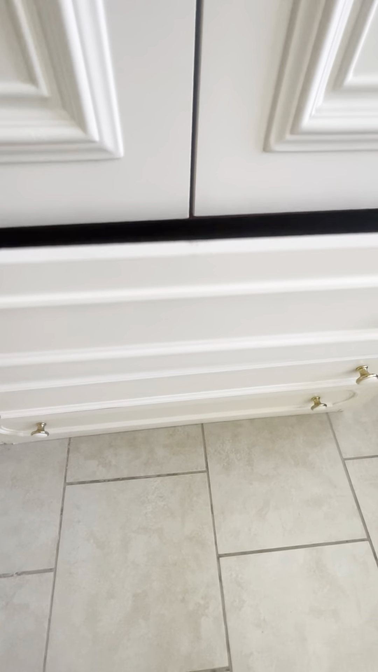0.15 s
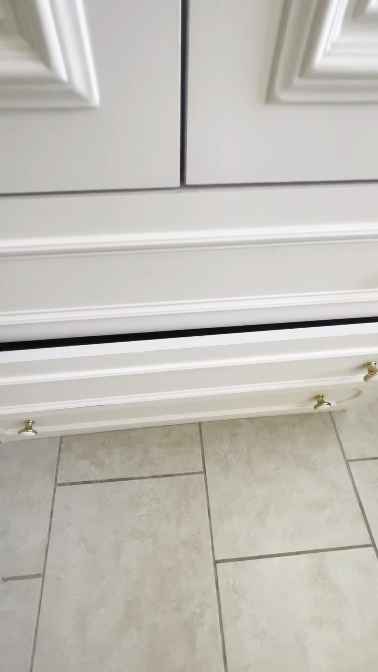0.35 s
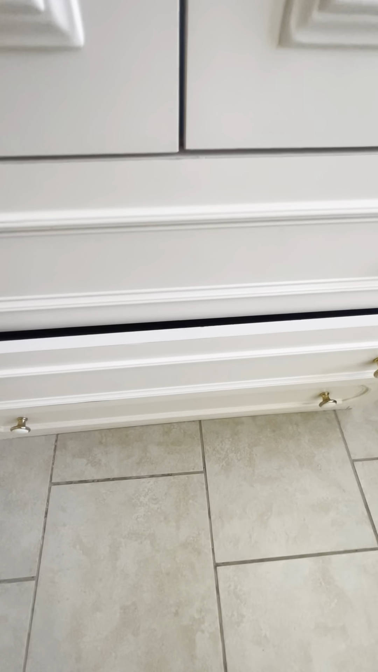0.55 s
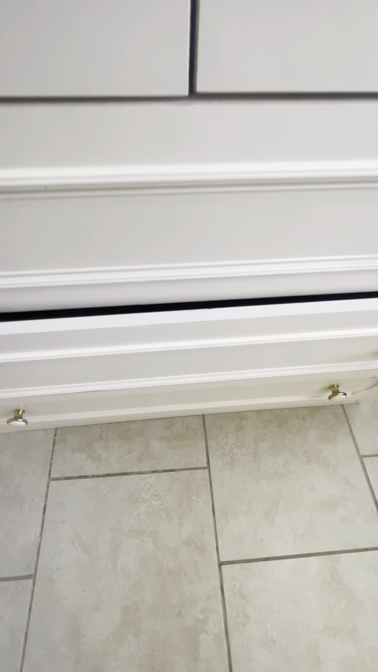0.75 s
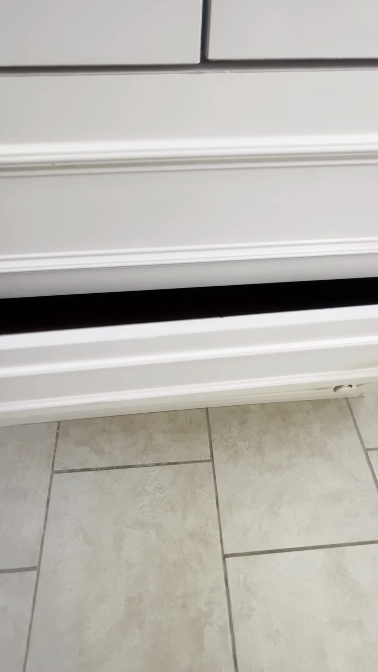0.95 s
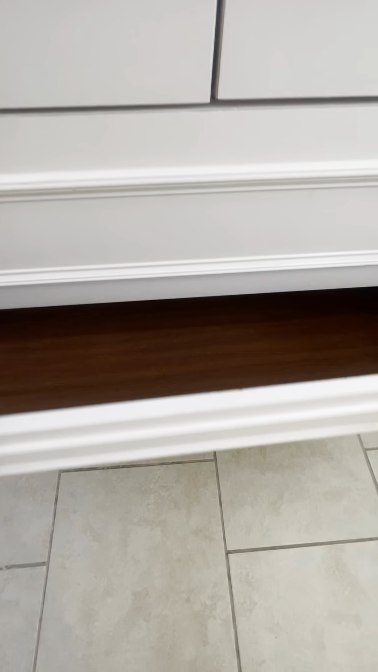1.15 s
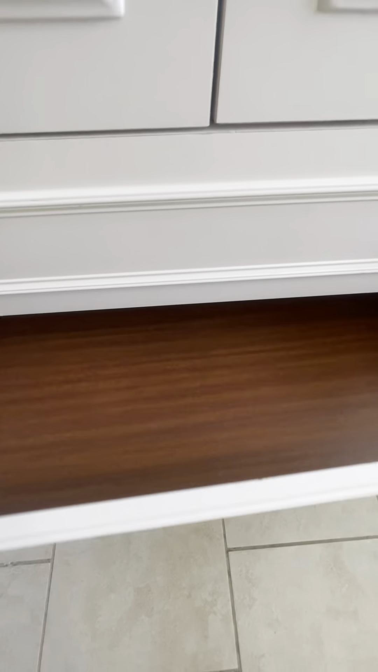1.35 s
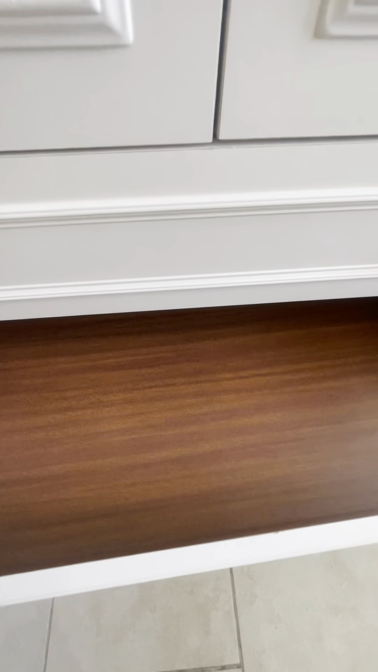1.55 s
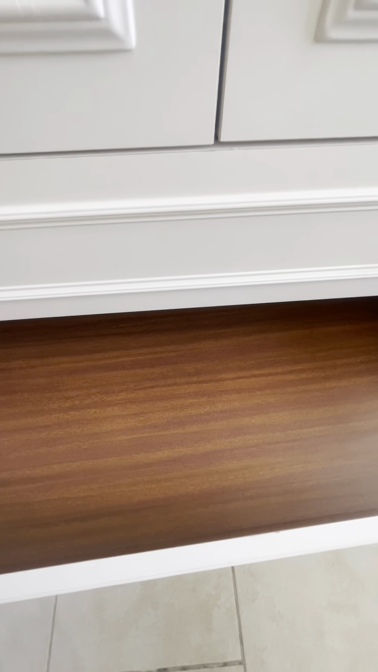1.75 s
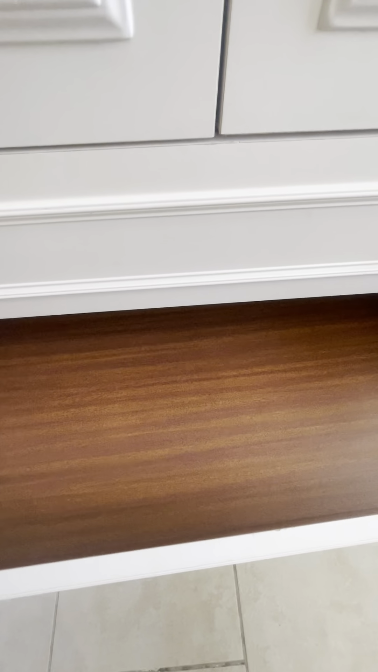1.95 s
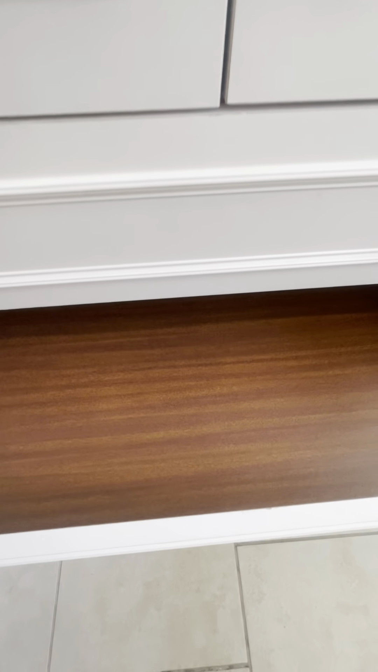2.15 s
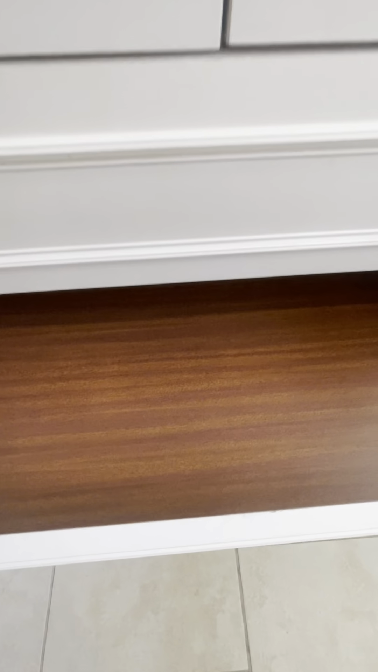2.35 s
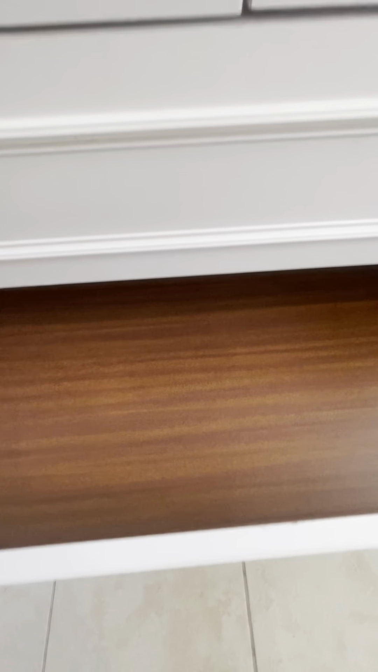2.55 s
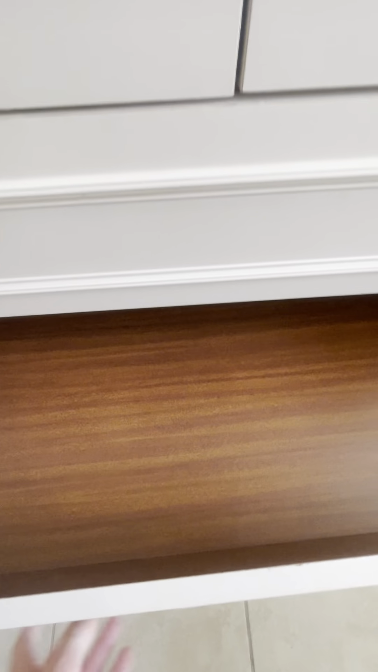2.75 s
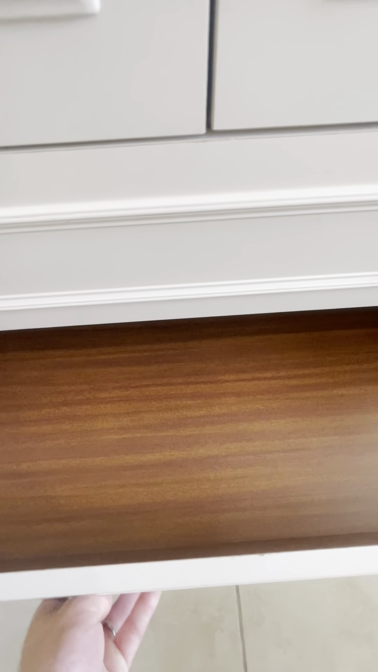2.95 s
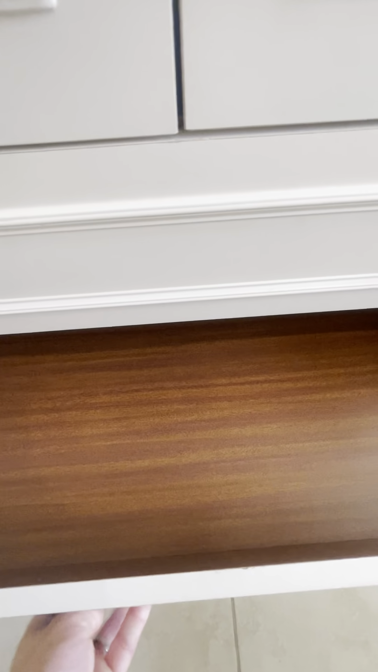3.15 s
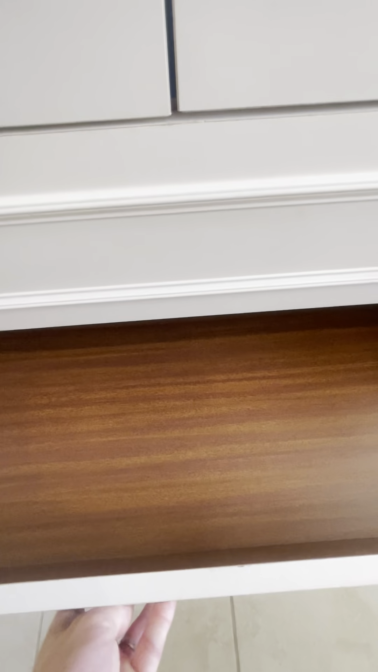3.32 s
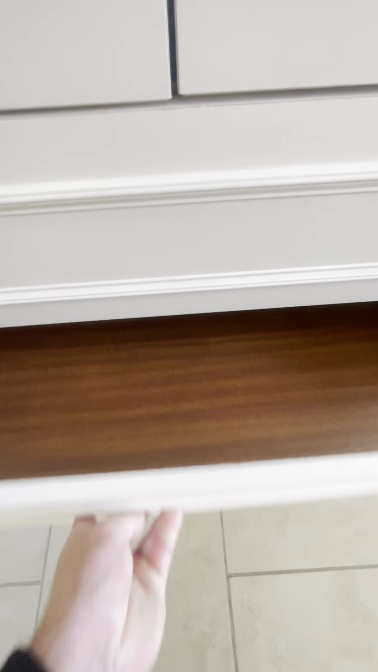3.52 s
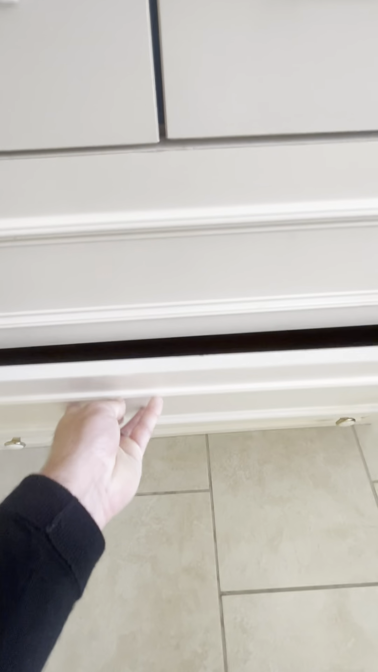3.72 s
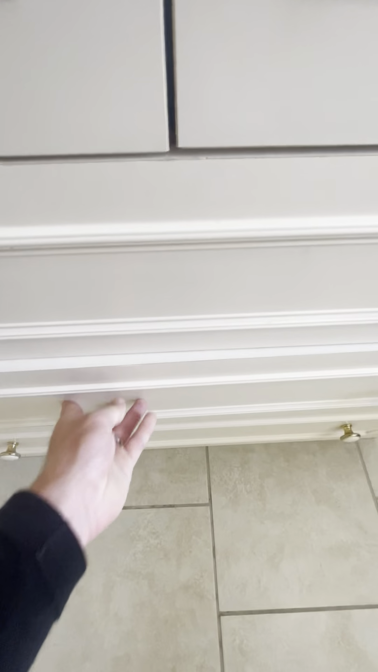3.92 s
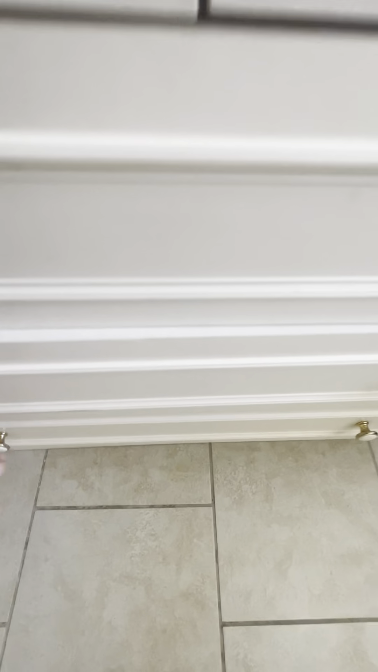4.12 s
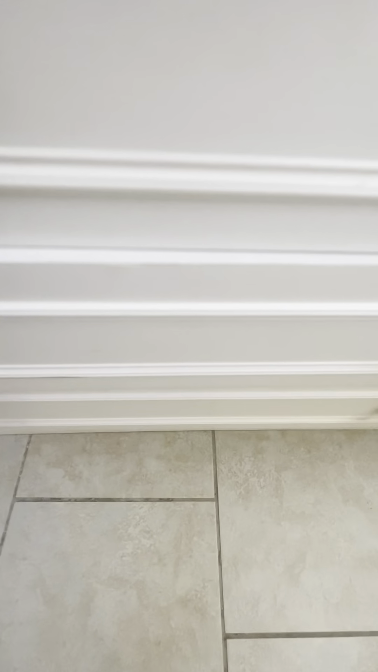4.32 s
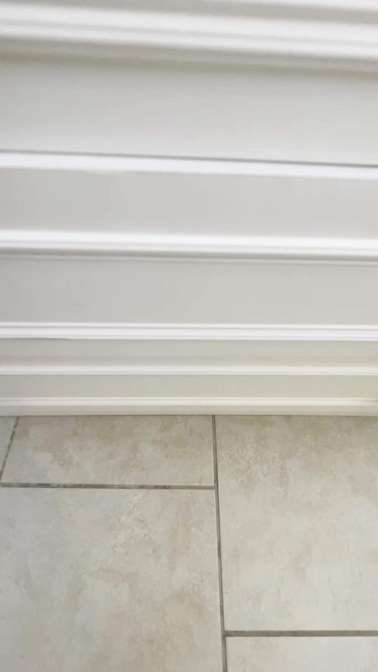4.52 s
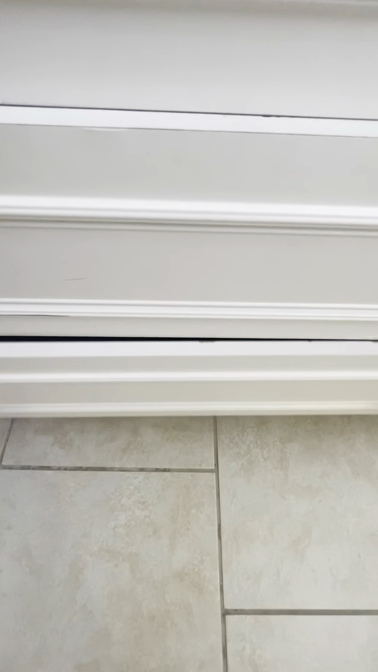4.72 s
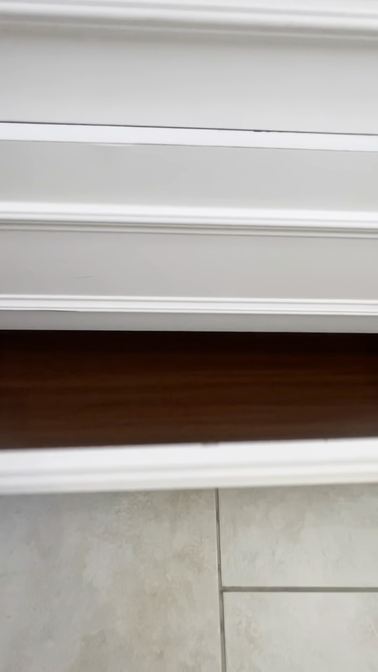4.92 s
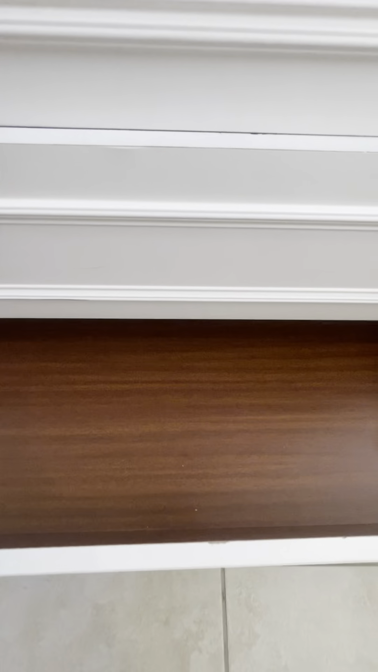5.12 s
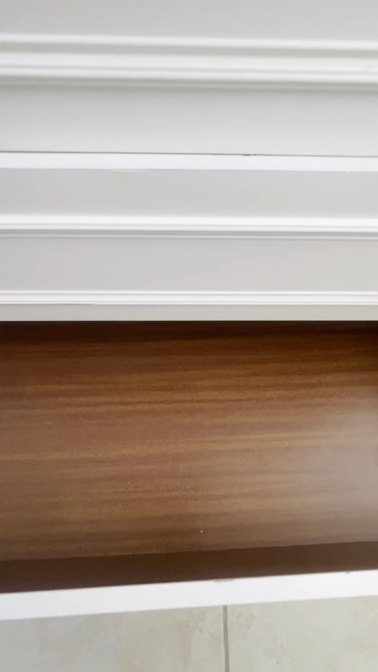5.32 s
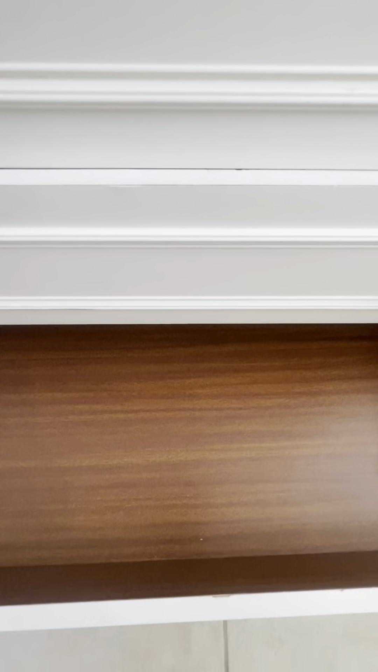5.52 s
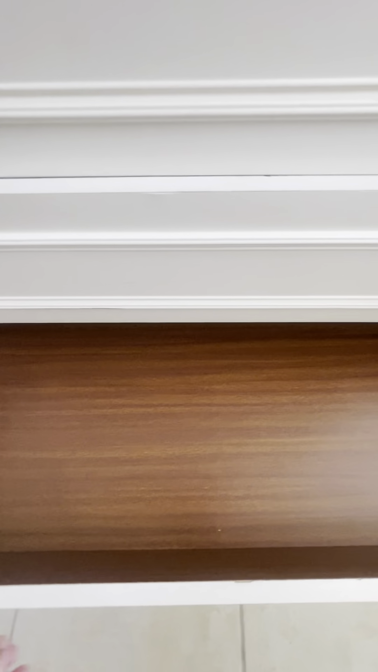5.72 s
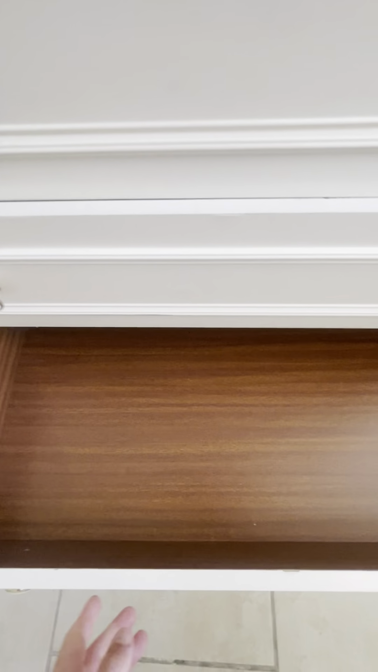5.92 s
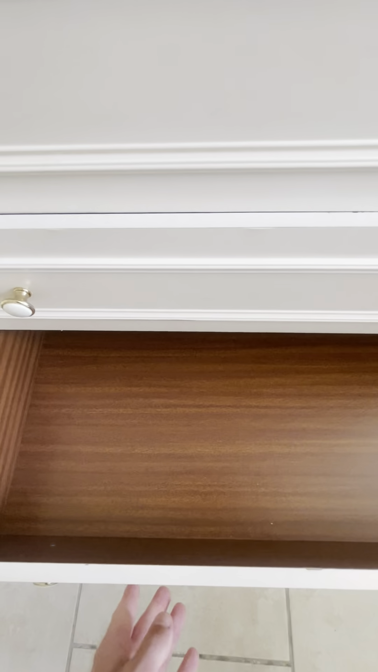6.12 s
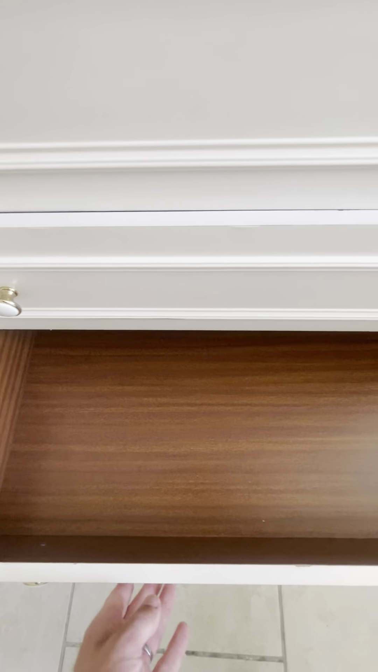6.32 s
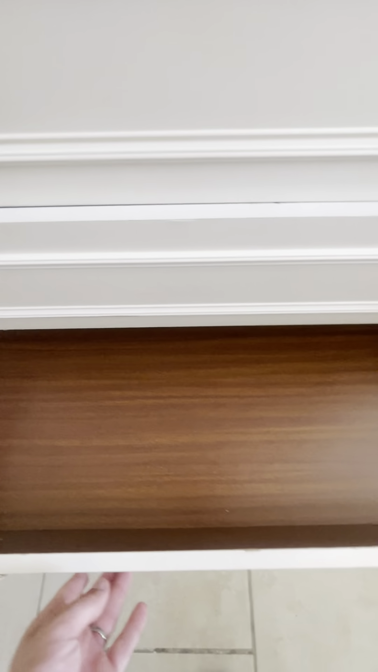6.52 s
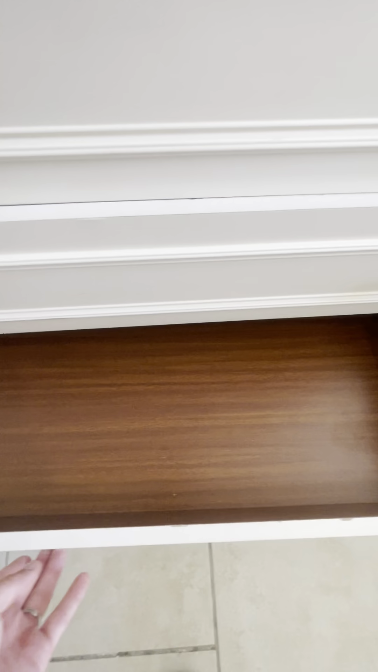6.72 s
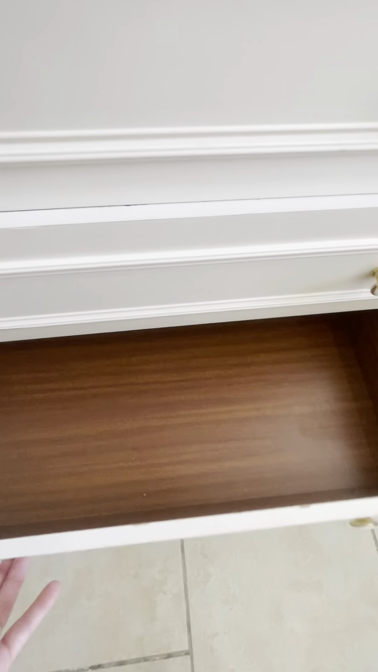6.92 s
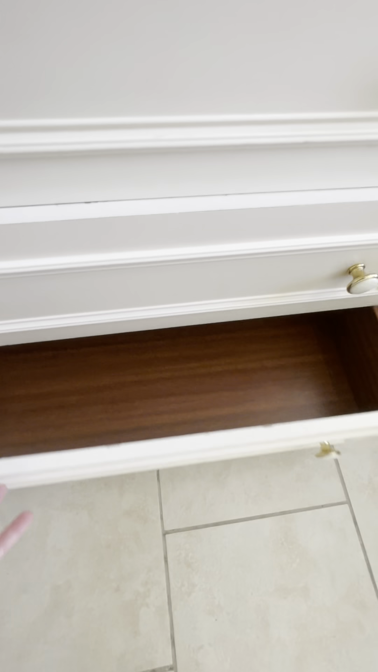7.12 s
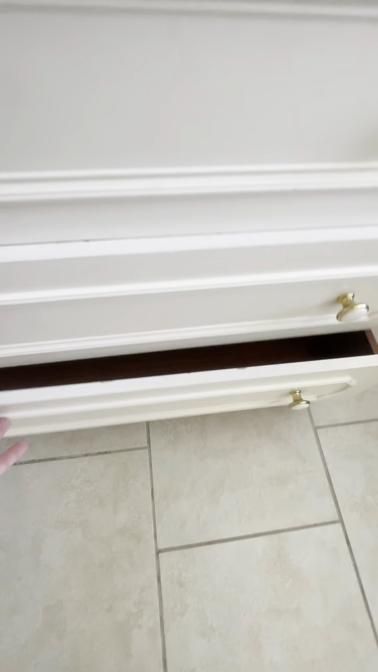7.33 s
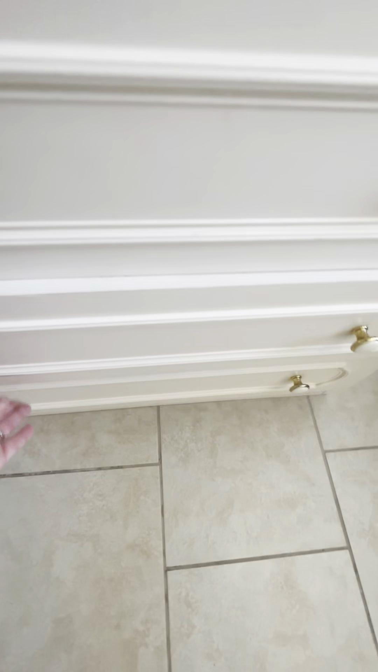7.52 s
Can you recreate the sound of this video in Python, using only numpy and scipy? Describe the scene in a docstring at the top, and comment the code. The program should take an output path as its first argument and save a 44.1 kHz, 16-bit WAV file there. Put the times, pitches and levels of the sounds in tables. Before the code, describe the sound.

Close to the microphone, a wooden drawer finishes sliding shut with a boomy thud, then is drawn open with a low humming rumble. After soft handling it is shoved back with jolts and a heavy double knock. A second drawer scrapes open to a bump, rests, then rasps and clacks shut. Quiet tiled room, short reflections, stereo leaning slightly left.

```python
"""Wooden drawers in a tiled bedroom

Two wardrobe drawers are pushed shut, pulled open and shut again, close to a two-port microphone.
Stick-slip friction on the runners excites the modes of the carcass, the thin bottom, the sides and the surface.
Jolts and knocks against the stops thump and clack the same parts; dry runners rasp, brass knobs ring faintly,
a sleeve rustles, and diffuse reflections ring for about half a second above faint room noise."""
import sys
import numpy as np
from scipy import signal
from scipy.fft import rfft, irfft, next_fast_len
from scipy.io import wavfile
from scipy.ndimage import uniform_filter1d

SR = 44100
rng = np.random.default_rng(int(sys.argv[2]) if len(sys.argv) > 2 else 0)


def store_wav(level_fs):
    """Save 16-bit WAV to argv[1]."""
    pcm = np.round(np.clip(np.atleast_2d(level_fs), -1, 1) * 32767)
    wavfile.write(sys.argv[1], SR, pcm.T.astype(np.int16))


N = 338186
TIME = np.arange(N) / SR  # s
RING = TIME[:int(0.5 * SR)]  # time axis of one impulse response, s


def undb(db):
    """Level to amplitude: 20 dB is a factor of ten."""
    return 10 ** (np.asarray(db) / 20)


def unit(x):
    """Energy normalisation: the squares sum to one."""
    return x / np.sqrt(np.sum(x ** 2))


def fade(t60):
    """Exponential damping: the amplitude falls by 60 dB in t60 seconds."""
    return np.exp(-np.log(1000) * RING / t60)


def colour(x, points):
    """Minimum-phase filtering: the cepstrum of a gain curve through (f/Hz, level/dB) is folded to be causal."""
    hz, db = np.transpose(points)
    size = 2 * next_fast_len(len(x))
    axis_hz = np.arange(size // 2 + 1) * SR / size
    curve_db = np.interp(np.log(axis_hz + 1), np.log(hz), db)
    cepstrum = irfft(np.log(undb(curve_db)))
    cepstrum[1:size // 2] *= 2
    cepstrum[size // 2 + 1:] = 0
    response = np.exp(rfft(cepstrum))
    return irfft(rfft(x, size) * response)[:len(x)]


def add(track, s, sound):
    """Linear superposition: mix a sound in from time s."""
    start = max(int(s * SR), 0)
    track[start:start + len(sound)] += sound[:N - start]


def speed(t, start, rise, hold, fall):
    """Trapezoidal kinematics: a move of the hand speeds up, runs steadily and slows to rest, 0 to 1."""
    speeding_up = (t - start) / rise
    slowing_down = 1 + (start + rise + hold - t) / fall
    return np.clip(np.minimum(speeding_up, slowing_down), 0, 1)


SLIDE_LAW = 1.055  # friction noise amplitude grows as speed to this power


def wander(rate):
    """Slow random modulation: Gaussian values held for 1 / rate s, then smoothed."""
    hold = int(SR / rate)
    steps = np.repeat(rng.standard_normal(N // hold + 1), hold)
    return uniform_filter1d(steps, hold)[:N]


def burst(t60):
    """Multipath scattering: one contact, spread over many paths in the wood, is a dying even-spectrum crackle."""
    spectrum = rfft(rng.standard_normal(len(RING)) * fade(t60))
    return irfft(spectrum / np.abs(spectrum), len(RING)) * fade(2 * t60)


# separate modes of each wooden part, before random scatter: f/Hz, level/dB, t60/s
CARCASS_MODES = [(44, -31, .25), (72.7, -1, 0.71), (95, 5.5, 0.25), (126.1, -7.5, 0.17), (147, -5.5, 0.16)]
BOTTOM_MODES = [(170, -18.5, 0.13), (202, -9, 0.46), (227.9, 5.5, 0.11), (262.6, -3.5, 0.27),
                (291.8, -4.5, 0.14), (335, -26.5, 0.12), (430, -30, 0.019)]
SIDE_MODES = [(470, 0, 0.048), (529, 7.5, 0.052), (683, -3.5, 0.15), (790, -1.5, 0.046), (913, -1, 0.033),
              (1102, -1.5, 0.078), (1192, -2.5, 0.085), (1419, -9.5, 0.02), (1700, -4, 0.029),
              (1900, -1.5, 0.08), (2138, -2.5, 0.088), (2520, -9, 0.04)]
SURFACE_MODES = [(3150, -3.5, 0.09), (4440, -17.5, 0.023), (5100, 5, 0.019), (6200, -7, 0.016),
                 (8630, -3.5, 0.045)]
# spectra of the crowded short modes of each part: f/Hz, level/dB
CARCASS_BLUR = [(15, -56), (33, -32.5), (45, 0.5), (65, 4), (95, 7), (150, -3.5), (210, -27.5), (400, -61)]
BOTTOM_BLUR = [(80, -58), (170, 0), (260, -5.5), (340, -1.5), (430, -20), (600, -41), (1200, -80)]
SIDE_BLUR = [(200, -41), (420, 4.5), (750, -3), (1250, -5), (1700, -5.5), (2100, -5.5), (2800, -8.5),
             (4200, -19), (9000, -69.5)]
SURFACE_BLUR = [(1200, -43), (2800, 6.5), (4000, 3.5), (6300, 0), (9000, -0.5), (11500, -4), (13000, -23),
                (16000, -23)]
# a part's number is its row here and in VOICING: 0 carcass, 1 bottom, 2 sides, 3 surface
PARTS = [(CARCASS_MODES, CARCASS_BLUR), (BOTTOM_MODES, BOTTOM_BLUR),
         (SIDE_MODES, SIDE_BLUR), (SURFACE_MODES, SURFACE_BLUR)]
# balance of each part: crowded modes level/dB, their nominal t60/s, sliding level/dB, blows level/dB,
# slip rate/(1/s), slip size spread/dB, room level/dB, left minus right level/dB
VOICING = [(-4.5, 0.11, 5.5, 0.5, 360, 3, -2.5, 3.5), (-6.5, 0.24, 0, -3, 260, 5, -8.5, 4.5),
           (5.5, 0.046, -1.5, 0.5, 520, 5, -3.5, 6), (14, 0.075, -13.5, 5.5, 2400, 7, -3.5, 4)]


def wood(part, near_hz=None, scatter_db=4.5, detune=0.012, focus_db=5):
    """Modal superposition: contact favours the modes near one pitch, falling focus_db an octave either way."""
    modes, blur = PARTS[part]
    blur_db, blur_t60 = VOICING[part][:2]
    ring = 0
    for (hz, db, t60), (a, b) in zip(modes, rng.standard_normal((len(modes), 2))):
        sign = np.sign(a) if part >= 2 else 1  # high modes change sign from place to place
        tone = np.sin(2 * np.pi * hz * (1 + detune * b) * RING)
        ring = ring + sign * undb(db + scatter_db * a) * fade(t60) * tone
    crowd = colour(burst(blur_t60), blur)
    ring = unit(ring) + undb(blur_db) * unit(crowd)
    if near_hz:
        focus = [(near_hz * 2. ** octave, -focus_db * abs(octave)) for octave in range(-2, 3)]
        ring = colour(ring, focus)
    return unit(ring)


def diffuse(left, right, alike_hz=330):
    """Diffuse-field coherence: both ports share the bass, while their treble is unrelated."""
    low = signal.butter(2, alike_hz, fs=SR, output="sos")
    high = signal.butter(2, alike_hz, "high", fs=SR, output="sos")
    side = signal.sosfilt(high, right) / np.sqrt(2)
    mid = signal.sosfilt(low, left) - signal.sosfilt(high, left) / np.sqrt(2)
    return np.array([mid + side, mid - side])


ROOM_T60_S = 0.47


def reflections(x, build_s=0.0011):
    """Reverberation by convolution: drawer and microphone move, so each quarter second has a new fine pattern."""
    hop = SR // 4
    padded = np.pad(x, (hop, 2 * hop))
    window = np.sin(np.pi * np.arange(2 * hop) / (2 * hop))
    decay = fade(ROOM_T60_S) * (1 - np.exp(-(RING / build_s) ** 2))
    out = np.zeros((2, len(padded) + len(RING)))
    for start in range(0, N + hop, hop):
        noise = diffuse(*rng.standard_normal((2, len(RING))))
        tail = unit(noise * decay) * np.sqrt(2)
        echo = signal.fftconvolve(tail, [padded[start:start + 2 * hop] * window], axes=1)
        out[:, start:start + echo.shape[1]] += echo
    return out[:, hop:hop + N]


# lead of the left port for the left and the right runner: t/s
RUNNER_LAGS_S = [0.000476, 0.00017]


def bedroom(sources, room_db, pan_db, near=np.zeros((2, 1))):
    """Direct and reverberant field: sources reach the left port first, near blows join, tiles and walls answer."""
    left = sum(sources)
    right = sum(np.interp(TIME - lag, TIME, x) for x, lag in zip(sources, RUNNER_LAGS_S))
    room = reflections(left + near[0])
    pan = undb(np.array([[pan_db], [-pan_db]]) / 2)
    return (np.array([left, right]) + near + undb(room_db) * room) * pan


AIR_DB = -55  # rms level of the room noise
# spectrum of the still air in the room: f/Hz, level/dB
AIR_SPECTRUM = [(15, -37.5), (25, -21), (140, 5), (271, -10.5), (382, -1.5), (436, -17.5), (498, -12.5),
                (599, -26.5), (761, -14.5), (2860, -31), (10500, -43.5), (11600, -48), (14000, -59.5)]


def air():
    """Stationary diffuse noise: a faint steady murk fills the room."""
    left, right = (colour(rng.standard_normal(N), AIR_SPECTRUM) for _ in range(2))
    return unit(diffuse(left, right)) * np.sqrt(2 * N) * undb(AIR_DB)


# moves of the arm in its sleeve: start t/s, speeding up t/s, steady t/s, slowing down t/s, level/dB
SLEEVE_MOVES = [(0.3, 0.3, 0.08, 0.53, -50), (2.45, 0.075, .8, .3, -50), (3.9, 0.31, 0.61, 0.5, -46),
                (4.6, 0.11, 0.55, .75, -51.5)]


def sleeve():
    """Fibre friction: cloth gives coloured noise of uneven grain that follows the speed of the arm."""
    fibres = rng.standard_normal(N) * undb(0.8 * np.minimum(rng.exponential(size=N), 5))
    cloth = colour(fibres, [(20, 1), (45, 31.0), (90, 25.5), (170, 15), (300, -4), (500, -1.5), (2000, -0.5),
                            (5000, -7.0), (9000, -6.0), (12000, -15.5), (15000, -42.5)])
    motion = sum(undb(db) * speed(TIME, *move) ** SLIDE_LAW for *move, db in SLEEVE_MOVES)
    return unit(cloth) * np.sqrt(N) * motion


# jolts that ring a knob: t/s, level/dB
KNOB_JOLTS = [(2.521, -47), (2.974, -58), (3.202, -51.5), (3.355, -44.5), (3.6, -42.5)]
# modes of a brass knob: f/Hz, level/dB, t60/s
KNOB_MODES = [(1950, -3, 0.21), (3360, -20.5, 0.27), (4340, -11.5, 0.32), (5216, -6, 0.16),
              (5440, 2.5, 0.26), (6360, -11, .38)]


def knobs():
    """Free vibration of metal: a jolted brass knob rings faintly in lightly damped modes."""
    out = np.zeros(N)
    ring = sum(undb(db) * fade(t60) * np.sin(2 * np.pi * hz * RING) for hz, db, t60 in KNOB_MODES)
    for s, db in KNOB_JOLTS:
        add(out, s, undb(db) * ring)
    return out


# uneven binding of the runners, carcass to surface: depth of level/dB
BIND_DB = [0.65, 2.3, 2.5, 1.1]
BINDS_PER_S = 30
# chatter of a runner or squeak of a fingertip: start t/s, speeding up t/s, steady t/s, slowing down t/s,
# level/dB, f/Hz, t60/s
RASPS = [(0.0, .005, 0.041, 0.035, -25.5, 256, .12), (1.04, 0.025, 0.22, 0.19, -48.5, 535, .12),
         (1.06, 0.053, 0.13, .04, -35, 252, 0.25), (1.15, .04, .08, .05, -42, 700, .2),
         (3.5, 0.018, .07, .25, -35.5, 501, 0.12), (5.235, 0.0039, 0.019, 0.082, -39, 2520, 0.011),
         (5.833, 0.0029, .005, 0.052, -54, 9200, 0.013), (5.852, 0.0044, 0.018, 0.034, -61.5, 7950, .02),
         (5.86, 0.006, 0.013, 0.029, -63, 6100, 0.019), (6.88, .03, .08, .05, -51, 715, .04),
         (7.0, 0.18, 0.16, .08, -42, 2000, .008), (7.125, 0.0089, 0.065, .06, -35.5, 512, 0.036)]


def rasps():
    """Resonant friction: a dry runner or a fingertip catches one resonance and chatters on it, unevenly."""
    out = np.zeros(N)
    grip = undb(BIND_DB[2] * wander(BINDS_PER_S)) * rng.standard_normal(N)
    for start, rise, hold, fall, db, hz, t60 in RASPS:
        run = slice(int(start * SR), int((start + rise + hold + fall) * SR))
        ring = unit(fade(t60) * np.sin(2 * np.pi * hz * RING))
        force = grip[run] * speed(TIME[run], start, rise, hold, fall)
        add(out, start, undb(db) * signal.fftconvolve(force, ring))
    return out


HUM_T60_S, HUM_WAVER, HUM_WAVERS_PER_S = 0.18, 0.03, 17  # waver is a fraction of the pitch


def hum(push, hz):
    """Time-varying resonance: the thin bottom hums, its pitch wavering as the load on the runners shifts."""
    length = len(push) + len(RING) - 1
    pitch = hz * (1 + HUM_WAVER * wander(HUM_WAVERS_PER_S)[:length])
    turn = np.exp(2j * np.pi * np.cumsum(pitch) / SR)  # rotating phase of the resonance
    envelope = signal.fftconvolve(push / turn[:len(push)], unit(fade(HUM_T60_S)))
    return np.sqrt(2) * np.imag(turn * envelope)


RASP_FOCUS_DB, HUM_FOCUS_DB = 3.5, 6.5  # how strongly sliding favours its pitch, dB per octave
# share of a run's boom and of its grit that reaches carcass, bottom, sides, surface: factor on level/dB
BOOM_SHARE = [0.9, 0.41, 0.37, 0.029]
GRIT_SHARE = [0, 0, 0, 1]
# runs of a drawer: start t/s, speeding up t/s, steady t/s, slowing down t/s, force level/dB,
# carcass boom level/dB, bottom hum level/dB, grit level/dB, rasp f/Hz, hum f/Hz
SLIDES = [(0.0, 0.00039, 0.01, 0.46, -41, 14, 4.5, 6.5, 1160, 249),
          (0.809, 0.23, 0.26, 0.43, -38.5, 1, 4.5, -0.5, 1320, 245.7),
          (1.937, 0.12, 0.1, 0.061, -50, 6, 2.5, 5.5, 1090, 251),
          (2.268, 0.013, 0.025, 0.11, -55, 11, -11, 4.5, 1200, 261),
          (2.56, 0.02, 0.52, 0.17, -68, 22.5, 9, -3, 900, 249.4),
          (3.171, 0.016, 0.022, 0.16, -46.5, 8.5, 0, 6.5, 1490, 247),
          (3.33, 0.027, 0.19, 0.034, -43, 5.5, 2.5, 10, 1500, 254),
          (3.483, 0.0091, 0.029, 0.27, -27.5, 2.5, -5, 6, 1530, 252),
          (3.68, 0.037, 0.034, 0.18, -38, 3, 2.5, 0, 1400, 251.4),
          (4.556, 0.02, 0.16, 0.048, -43, 3.5, -18, 4, 1000, 290),
          (4.73, .21, 0.11, 0.069, -27.5, -8, -12, -9.5, 1110, 251),
          (5.061, 0.024, 0.046, 0.24, -48, 8, 7.5, 10, 800, 232),
          (5.225, 0.014, 0.02, 0.19, -43.5, -2, 1, 1, 2600, 205),
          (5.33, 0.021, 0.11, 0.068, -51.5, 0, 10, 6, 1100, 240),
          (5.469, 0.0088, 0.012, 0.11, -56.5, 22, -11, 14, 950, 207),
          (6.417, 0.24, 0.034, 0.047, -44.5, 5, -8, 6, 1500, 243),
          (6.6, 0.2, 0.4, 0.1, -51.5, -10, -4, -4, 700, 241),
          (6.86, 0.058, 0.093, 0.05, -50, -1, -10, 5.5, 1200, 244),
          (6.96, 0.09, 0.13, 0.15, -32, -13.5, -3, 2, 1120, 240),
          (7.2, 0.054, 0.31, 0.09, -36.5, -0.5, -18, -1.5, 1010, 227),
          (7.52, 0.07, 0.031, 0.091, -56, 13, 2, 14, 1400, 227)]


def sliding(part):
    """Stick-slip friction: random slips along one runner shake a part, each run touching it somewhere else."""
    gain_db, _, rate, spread_db = VOICING[part][2:6]
    sizes = undb(spread_db * np.minimum(rng.exponential(size=N), 4))
    slips = (rng.random(N) < rate / SR) * rng.choice([-1, 1], N) * sizes
    slips = unit(slips) * np.sqrt(N / 2) * undb(BIND_DB[part] * wander(BINDS_PER_S))
    focus_db = HUM_FOCUS_DB if part == 1 else RASP_FOCUS_DB
    out = np.zeros(N)
    for start, rise, hold, fall, force_db, boom_db, hum_db, grit_db, rasp_hz, hum_hz in SLIDES:
        run = slice(max(int(start * SR), 0), int((start + rise + hold + fall) * SR))
        db = gain_db + force_db + BOOM_SHARE[part] * boom_db + GRIT_SHARE[part] * grit_db
        force = undb(db) * speed(TIME[run], start, rise, hold, fall) ** SLIDE_LAW
        push = slips[run] * force
        ring = wood(part, [None, hum_hz, rasp_hz, None][part], focus_db=focus_db)
        if part == 1:
            add(out, start, undb(hum_db) * hum(push, hum_hz))
        add(out, start, signal.fftconvolve(push, ring))
    return out


def catch(part, near_hz, chatter_s=0.0074):
    """Contact chatter: two surfaces catch lightly in a brief crackle that rings the wood."""
    ring = wood(part, near_hz, focus_db=6.5)
    return unit(signal.fftconvolve(ring, burst(chatter_s))[:len(RING)])


TICK_CLACK_HZ = 1450  # catches ring the sides near this pitch
# catches of runners and fingers, and cracks at the stops: t/s, level/dB,
# sharpness (surface relative to sides) level/dB, brightest f/Hz
TICKS = [(0.1163, -45, -4, 5350), (0.3321, -26.5, -8.5, 6120), (0.3471, -29, -4, 4120),
         (0.843, -50, -9, 4600), (0.8708, -48, -5, 6800), (2.038, -68, 15, 9700), (2.1215, -46.5, -4, 9250),
         (2.282, -56, -5, 3140), (2.336, -46.5, -9, 5100), (2.5221, -35, -7.5, 5000),
         (2.697, -61.5, 1, 11600), (2.972, -46.5, -12.5, 4890), (3.0468, -40.5, -8, 3900),
         (3.1764, -43.5, -12, 3320), (3.203, -38, -4.5, 5860), (3.3107, -40, -4, 5140),
         (3.32, -37, -13, 5500), (3.3536, -34.5, 1.5, 6350), (3.6, -28.5, -9, 5550),
         (3.8292, -27, -7, 3840), (4.727, -38, -11, 4770), (5.018, -38, -0.5, 5400), (5.026, -33, -4, 4570),
         (5.2152, -42.5, -4.5, 9100), (5.239, -48.5, 2.5, 8950), (5.285, -57, 4, 7950),
         (5.589, -63.5, -1, 6800), (6.41, -53.5, -16.5, 8900), (6.4572, -53.5, -1.5, 10400),
         (6.5405, -65.5, 8, 4600), (6.5938, -55.5, 3, 7200), (6.717, -42, -6.5, 4000),
         (6.8587, -52, -8.5, 3560), (7.013, -48, -3, 3620), (7.042, -34, -9, 7900),
         (7.1922, -26.5, -10, 4500), (7.5096, -27.5, -9, 4160), (7.522, -30, -21, 3500),
         (7.572, -32.5, -18, 3000)]


def ticks(part, tick_s=0.02, tick_db=-2):
    """Selective excitation: light catches ring only the sides and, the sharper they are, the surface."""
    out = np.zeros(N)
    if part >= 2:
        size = undb(tick_db + VOICING[part][3]) * np.sqrt(tick_s * SR)
        for s, level_db, sharp_db, bright_hz in TICKS:
            db, near_hz = (level_db, TICK_CLACK_HZ) if part == 2 else (level_db + sharp_db, bright_hz)
            add(out, s, catch(part, near_hz) * undb(db) * size)
    return out


THUMP_DB_PER_OCTAVE = 8  # a part answers less to a thump away from its pitch
THUMP_FOCUS_DB = 4.5  # how strongly a thump favours its pitch, dB per octave
STRIKE_DB, SWELL_DB, SWELL_S = -3, -4.5, 0.0075  # first push, later swing, time to the peak of its envelope
# pitches at which carcass and bottom answer best: f/Hz
THUMP_HZ = [95, 240]


def thump(part, hz):
    """Resonant build-up: a part is pushed at once; the panel nearest in pitch then swings up and dies away."""
    octaves_off = abs(np.log2(hz / THUMP_HZ[part]))
    push = undb(STRIKE_DB - THUMP_DB_PER_OCTAVE * octaves_off) * wood(part, hz, focus_db=THUMP_FOCUS_DB)
    nearest_part = np.argmin(np.abs(np.log2(hz / np.array(THUMP_HZ))))
    if part != nearest_part:
        return push
    swing = RING * np.exp(-RING / SWELL_S) * np.sin(2 * np.pi * hz * RING)
    return push + undb(SWELL_DB) * unit(swing)


CLACK_FOCUS_DB = 8.5  # how strongly a clack favours its pitch, dB per octave
SOFT_CONTACT_DB = 13  # loss of a blunt contact from 1.8 times its dull pitch upwards
SPREAD_DB, SPREAD_T60_S = -9, 0.36  # rattle of doors and panels after a clack
RATTLE_DB, RATTLES_PER_S = 4, 110  # loose doors bounce unevenly in their frames


def clack(hz, dull_hz):
    """Impact and energy spreading: a side clacks near one pitch, then doors and panels rattle and fade."""
    soft_contact = [(dull_hz, 0), (1.8 * dull_hz, -SOFT_CONTACT_DB)]
    strike = colour(wood(2, hz, focus_db=CLACK_FOCUS_DB), soft_contact)
    bounces = undb(RATTLE_DB * wander(RATTLES_PER_S)[:len(RING)])
    rattle = rng.standard_normal(len(RING)) * bounces * fade(SPREAD_T60_S)
    return unit(strike) + undb(SPREAD_DB) * unit(colour(rattle, SIDE_BLUR))


# knocks against the stops and jolts on the runners: t/s, thump level/dB, thump f/Hz,
# clack level/dB, clack f/Hz, dull above f/Hz
KNOCKS = [(0.183, -18, 87.5, -55, 646, 2000), (0.334, -14, 282, -20.5, 1090, 2200),
          (0.339, -4.5, 204.5, -15.5, 445, 1330), (0.346, -6, 290, -18, 1700, 3000),
          (0.361, -11, 121, -22, 453, 2500), (0.406, -11, 116, -31, 1000, 2800),
          (0.883, -26, 90, -65, 563, 2000), (0.938, -30, 95, -40.5, 1280, 2600),
          (0.958, -21, 92, -43.5, 800, 2000), (1.046, -21, 104, -55, 800, 2000),
          (1.105, -19.5, 241, -56, 540, 1500), (1.176, -20.5, 240, -49, 600, 1475),
          (1.222, -18, 247, -47, 800, 1500), (1.342, -24, 259, -57.5, 795, 1520),
          (1.41, -23.5, 95, -50, 800, 1535), (1.508, -41, 270, -61, 802, 1500),
          (2.283, -42, 230.4, -48.5, 1464, 1900), (2.514, -20.5, 233, -36, 740, 1310),
          (2.532, -23, 95, -55, 650, 1500), (2.707, -30.5, 103, -63, 500, 1000),
          (2.847, -30, 240, -54.5, 530, 1000), (2.963, -38, 251, -44, 1880, 2040),
          (2.972, -28, 272, -45, 584, 1000), (2.991, -25.5, 252, -49, 700, 1493),
          (3.048, -36.5, 293, -45, 700, 2500), (3.203, -44, 254, -48, 810, 2500),
          (3.311, -36.5, 240, -41, 1610, 2220), (3.357, -20, 154, -33, 1240, 2440),
          (3.488, -25, 252.5, -28, 1450, 1700), (3.501, -12.5, 173, -25.5, 530, 2530),
          (3.524, -30, 200, -22, 1400, 3000), (3.527, -2, 265, -23.5, 639, 2480),
          (3.553, -23, 285, -26, 520, 2000), (3.581, -27, 240, -23.5, 503, 2500),
          (3.588, -9, 232, -30.5, 1800, 2500), (3.635, -27, 268, -31, 1000, 2200),
          (3.71, -22, 251, -33.5, 1370, 2190), (3.745, -21, 240, -40, 500, 1800),
          (3.83, -35, 153, -15, 1300, 2050), (3.838, -1.5, 172.4, -25, 496, 2500),
          (3.888, -13, 100.4, -41, 549, 1500), (4.58, -47, 150, -48, 1200, 2300),
          (4.593, -19.5, 90.5, -46, 907, 2010), (4.735, -14.5, 114, -43, 1900, 2500),
          (4.877, -54, 247, -33.5, 1200, 2440), (4.912, -27.5, 261, -35, 550, 2000),
          (5.039, -11.5, 235, -26.5, 570, 1100), (5.065, -15.5, 200, -34, 580, 1477),
          (5.142, -22, 289, -48, 720, 1520), (5.213, -25, 200, -34.5, 930, 2140),
          (5.484, -20.5, 198, -40, 524, 1200), (5.491, -27.5, 328, -43.5, 890, 1800),
          (5.501, -23, 126, -41, 550, 1900), (5.515, -19.5, 287, -40.5, 518, 808),
          (6.459, -38.5, 240, -50.5, 893, 2500), (6.594, -34.5, 227, -43.5, 625, 1500),
          (6.671, -37.5, 233, -40, 1040, 2300), (6.715, -38.5, 230, -55.5, 650, 2000),
          (7.013, -32, 228, -40.5, 2000, 2500), (7.058, -39, 240, -38.5, 457, 1200),
          (7.124, -21, 263, -28, 650, 1400), (7.139, -12, 240, -30, 520, 1500),
          (7.176, -18, 234, -37, 1100, 1500), (7.26, -29.5, 248, -40, 1090, 2000),
          (7.295, -28.5, 108, -41, 2000, 4500), (7.451, -15, 190, -23.5, 1310, 1490),
          (7.456, -13, 228, -18.5, 1200, 1360), (7.463, -15, 240, -20.5, 1140, 1370),
          (7.471, -26, 200, -21.5, 470, 1300), (7.515, -9.5, 220, -23, 460, 1200),
          (7.529, -9, 111.8, -29.5, 1900, 2600), (7.557, -15, 144.2, -34, 1200, 2350),
          (7.567, -13.5, 115, -24, 2000, 2420)]


def knocks(part, knock_s=0.019, bend_s=0.0011):
    """Bending-wave delay: a knock clacks the sides at once and thumps carcass and bottom slightly late."""
    out = np.zeros(N)
    size = undb(VOICING[part][3]) * np.sqrt(knock_s * SR)
    for s, thump_db, thump_hz, clack_db, clack_hz, dull_hz in KNOCKS:
        if part < 2:
            add(out, s + bend_s, thump(part, thump_hz) * undb(thump_db) * size)
        elif part == 2:
            add(out, s, clack(clack_hz, dull_hz) * undb(clack_db) * size)
    return out


CLACK_LIKENESS = 0.47  # how alike a clack is at the two ports, 0-1


def blows(part):
    """Interaural-style delay and decorrelation: thumps and catches reach the right port late, clacks differ."""
    def late(x):
        """Propagation delay to the right port."""
        return np.interp(TIME - RUNNER_LAGS_S[0], TIME, x)

    struck, catches = knocks(part), ticks(part)
    if part == 2:  # the wide sides radiate differently towards each port
        right = CLACK_LIKENESS * struck + np.sqrt(1 - CLACK_LIKENESS ** 2) * knocks(part)
    else:
        right = late(struck)
    return np.array([struck + catches, right + late(catches)])


def scene():
    """Superposition of sources: still air, sleeve, knobs and rasps, then the four parts slid and struck."""
    background = air() + bedroom([sleeve()], room_db=0.5, pan_db=3.5)
    details = bedroom([knobs()], room_db=-9, pan_db=8) + bedroom([rasps()], room_db=-6, pan_db=5)
    drawers = 0
    for part in range(len(PARTS)):
        runners = [sliding(part), sliding(part)]
        room_db, pan_db = VOICING[part][6:]
        drawers = drawers + bedroom(runners, room_db, pan_db, near=blows(part))
    return background + details + drawers


# the casing couples the ports in the treble: f/Hz, common sound level/dB, difference level/dB
CASING = [(60, 0, -2.5), (200, 0, 2), (1000, -.5, 0), (2000, -1, -1), (4000, 0.5, 0.5), (7160, 0, -0.5),
          (9200, 0, 5), (11200, 0, 0.5), (14000, 3, -0.5)]


def casing(ports):
    """Sum-and-difference filtering: common and differing sound are coloured apart, with zero phase."""
    hz, mid_db, side_db = np.transpose(CASING)
    axis = np.log(np.arange(N // 2 + 1) * SR / N + 1)

    def shape(x, db):
        """Zero-phase gain curve."""
        return irfft(rfft(x) * undb(np.interp(axis, np.log(hz), db)), N) / 2

    mid = shape(ports[0] + 0.96 * ports[1], mid_db)
    side = shape(ports[0] - 1.084 * ports[1], side_db)
    return np.array([mid + side, mid - side])


TOP_HZ = 15800  # upper band edge
# colour of the microphone ports: f/Hz, left level/dB, right level/dB
PORTS = [(12, -26, -24), (28, -12, -2), (50.5, -4.5, -3.5), (1200, -1.5, 0.5), (2090, -6.5, 1),
         (3060, -2, 0.5), (4040, -3.5, -4), (4970, 1.5, -4.5), (8300, -0.5, -8), (9420, -1.5, 5.5),
         (9980, -17, -14), (11270, 1.5, 5.5), (12300, -5.5, -4.5), (13700, -20, -11)]


def record(dry):
    """Transducer response: each port colours the sound, high peaks saturate softly and the top is cut."""
    ports = casing([colour(dry[k], np.array(PORTS)[:, [0, k + 1]]) for k in range(2)])
    rounded = ports / (1 + ports ** 4) ** (1 / 4)
    top_cut = signal.ellip(8, 0.2, 70, TOP_HZ, fs=SR, output="sos")
    return signal.sosfilt(top_cut, rounded)


dry = scene()
out = record(dry)
store_wav(out)
```